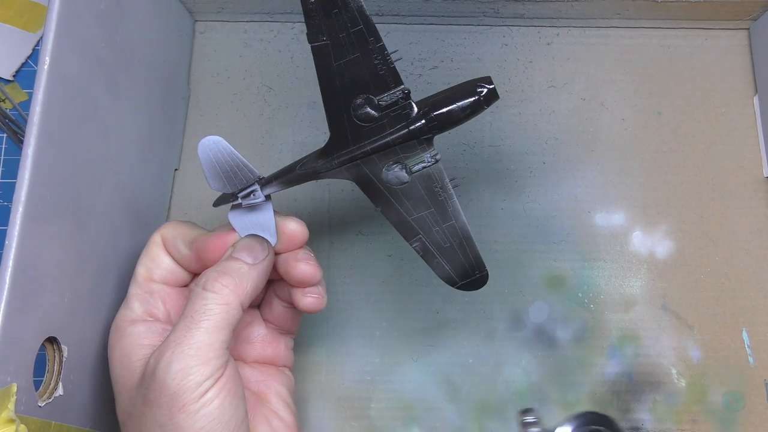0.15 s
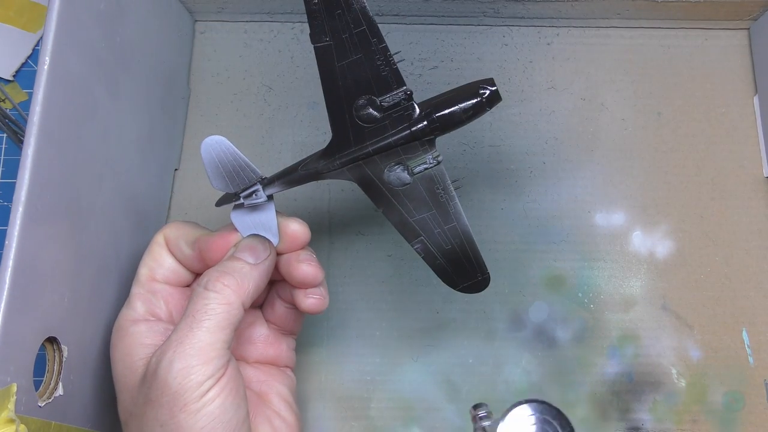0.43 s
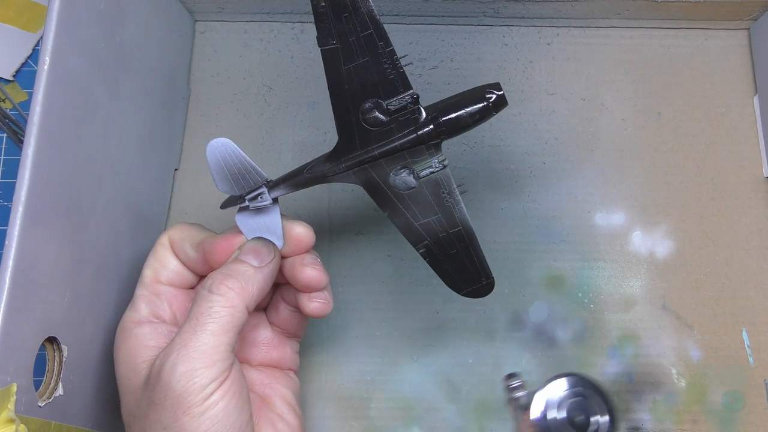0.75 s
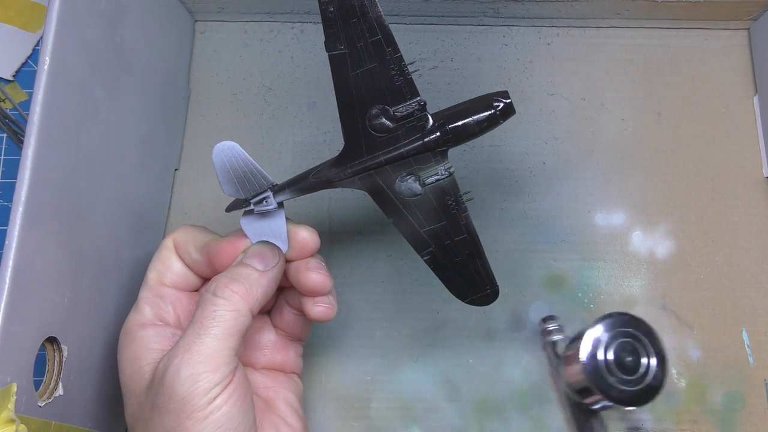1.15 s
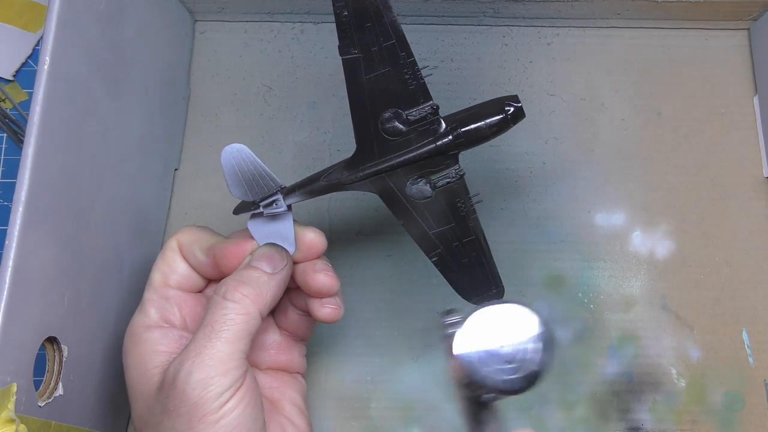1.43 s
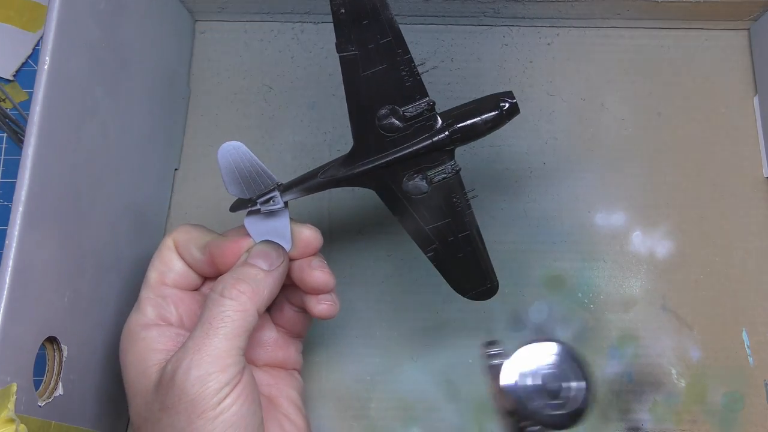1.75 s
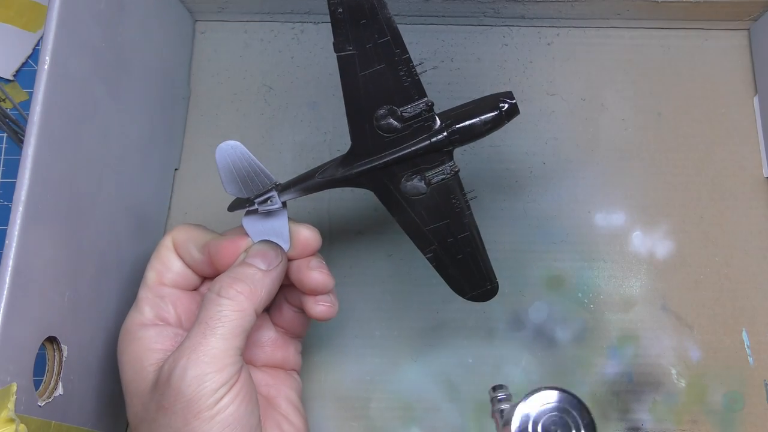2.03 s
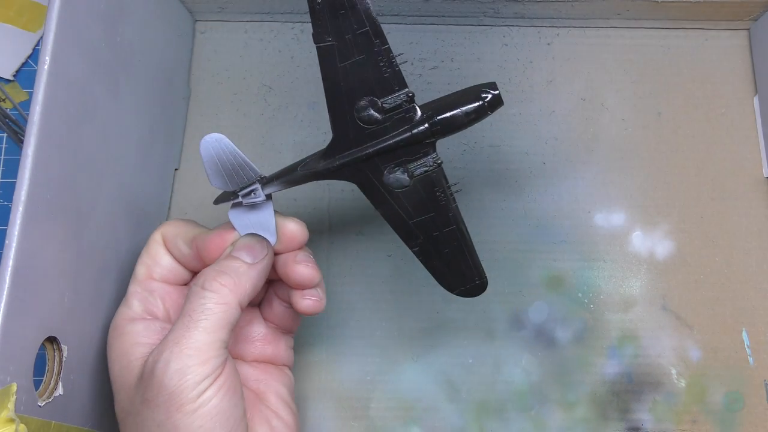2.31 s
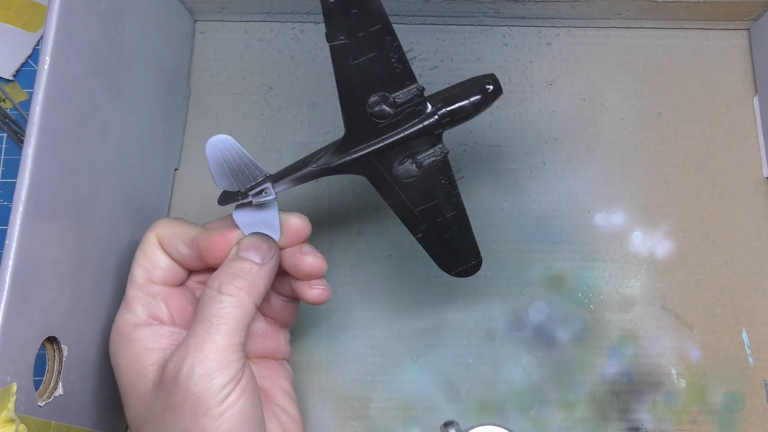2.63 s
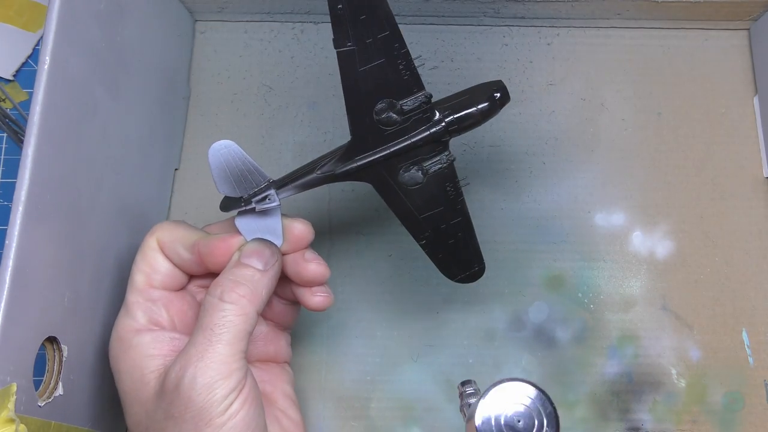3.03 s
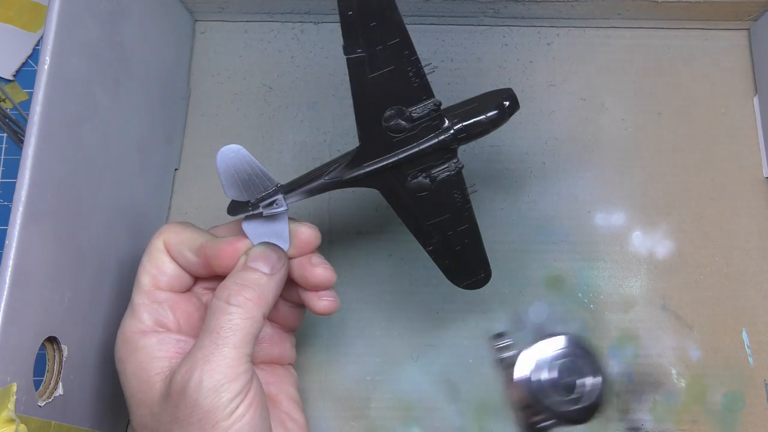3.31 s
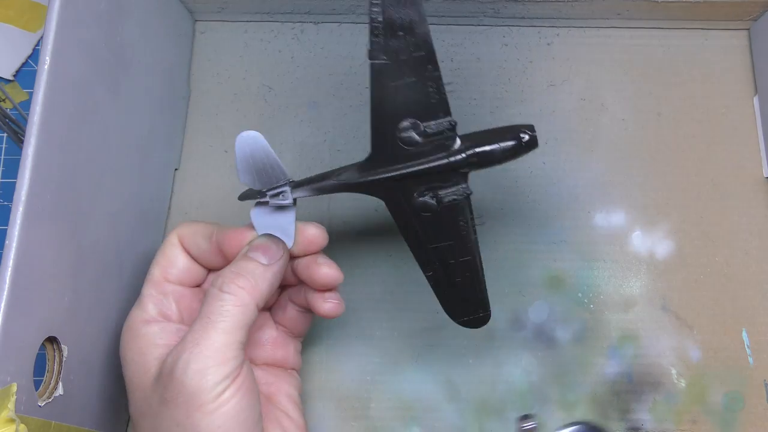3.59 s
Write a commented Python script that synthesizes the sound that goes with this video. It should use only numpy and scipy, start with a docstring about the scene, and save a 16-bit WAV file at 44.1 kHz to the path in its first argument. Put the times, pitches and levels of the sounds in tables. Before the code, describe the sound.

An airbrush hisses in one long spray and two short bursts over a low fan hum

```python
"""A cardboard booth in a small workroom: an airbrush sprays primer on a hand-held model, one long pass, two short.
The jet is shaped noise gated by a valve, with a gliding whistle, bands that ring up and drifting close echoes.
A duller rush of noise puffs where the jet crosses an edge of the model; a brief spit marks the last pull.
A fan of shaped noise and narrow tones hums behind. Handling is low gliding sines: a long rumble, a faint bump
and, at the end, a hollow knock with a noise scuff."""
import sys
import numpy as np
from scipy import signal
from scipy.io import wavfile
from scipy.ndimage import uniform_filter1d, map_coordinates

SR = 44100
rng = np.random.default_rng(int(sys.argv[2]) if len(sys.argv) > 2 else 0)


def to_wav(s):
    """Save 16-bit WAV."""
    ch = np.atleast_2d(s).T  # columns
    pcm = np.round(np.clip(ch, -1, 1) * 32767)  # PCM
    wavfile.write(sys.argv[1], SR, pcm.astype(np.int16))


N = 165375
T = np.arange(N) / SR
FFT_SIZE, HOP = 2048, 512
HZ = np.fft.rfftfreq(FFT_SIZE, 1 / SR)
FRAMES = N // HOP + 3


def amp(db):
    """Decibels to gain."""
    return 10 ** (np.asarray(db) / 20)


def unit(x):
    """Scales to rms 1."""
    return x / np.sqrt(np.mean(x ** 2) + 1e-20)


def over_hz(points):
    """Reads a table along log frequency."""
    hz, value = np.transpose(points)
    return np.interp(np.log(HZ + 1), np.log(hz + 1), value)


def over_time(points):
    """Reads a table along time."""
    return np.interp(T, *np.transpose(points))


def resonance(hz, width_hz):
    """A peak of height 1, width_hz wide at half height."""
    return 1 / (1 + (2 * (HZ - hz) / width_hz) ** 2)


def colour(points, peaks=()):
    """A broad spectrum with resonances on top, in dB."""
    return over_hz(points) + sum(lift_db * resonance(hz, width_hz) for hz, width_hz, lift_db in peaks)


def gaussian(centre_s, width_s):
    """A bell in time, peak 1; width_s is its standard deviation."""
    return np.exp(-.5 * ((T - centre_s) / width_s) ** 2)


def decay(t, t60_s):
    """An exponential fall of 60 dB in t60_s."""
    return np.exp(-np.log(1000) * t / t60_s)


def flicker(depth_db, size):
    """A random gain of rms depth_db that wanders over about size samples."""
    wander = signal.oaconvolve(rng.standard_normal(N), np.hanning(size), "same")
    return amp(depth_db * unit(wander))


# left-right likeness of airborne noise: pitch_hz, likeness (0-1)
AIR_SAME = [(100, 0.63), (450, 0.97), (1300, 0.91), (4400, 0.9), (7000, 1), (9000, 0.99), (11000, 0.72),
            (15000, 0.64)]
# left minus right: pitch_hz, balance_db
AIR_BALANCE = [(110, 3), (380, 1), (1290, -2.4), (4400, -.2), (8100, -.4), (15000, -2.2)]
# phase by which left leads: pitch_hz, lead_rad
AIR_PHASE = [(30, -.6), (110, -2), (380, -1.1), (1300, -.8), (2600, -.15), (15000, .1)]


def noise(shape_db, same, patchy_db=0):
    """Stereo noise of rms 1 with drifting patches, likeness, balance and phase set per frequency."""
    a, b, c, d, patches = np.moveaxis(rng.standard_normal((FRAMES, len(HZ), 5)), 2, 0)
    patches = uniform_filter1d(patches, size=16, axis=0)
    patches = unit(uniform_filter1d(patches, size=10, axis=1))
    like = np.clip(over_hz(same), -1, 1)
    left = a + 1j * b
    right = like * left + np.sqrt(1 - like ** 2) * (c + 1j * d)
    right = right * np.exp(-1j * over_hz(AIR_PHASE))
    lean = amp(over_hz(AIR_BALANCE) / 2)
    z = np.array([left * lean, right / lean]) * amp(shape_db + patchy_db * patches)
    _, x = signal.istft(z, nperseg=FFT_SIZE, noverlap=FFT_SIZE - HOP, time_axis=1, freq_axis=2)
    return unit(x[:, :N])


def narrow(hz, pole_width_hz):
    """A fuzzy complex tone, two-pole noise on a steady or moving pitch; its real part has rms 1."""
    keep = np.exp(-np.pi * pole_width_hz / SR)
    raw = rng.standard_normal(N) + 1j * rng.standard_normal(N)
    band = signal.lfilter([1], np.poly([keep, keep]), raw)
    turns = np.cumsum(hz * np.ones(N)) / SR
    return band / np.std(band.real) * np.exp(2j * np.pi * turns)


# fan noise: pitch_hz, density_db
FAN = [(25, -3), (90, -5.5), (185, 0), (280, -6.5), (800, -20.5), (1500, -19.5), (2500, -22.5), (3700, -34),
       (15500, -37.5)]
# duct resonance: pitch_hz, width_hz, lift_db
FAN_PEAKS = [(1820, 230, 3.5)]
# left-right likeness: pitch_hz, likeness (0-1)
FAN_SAME = [(60, 0.95), (150, 0.86), (1650, 0.28), (6000, 0.46)]
# hum and whines: pitch_hz, pole_width_hz, level_db
FAN_TONES = [(142.6, 20, -53.5), (957, 24, -65.5), (1768, 70, -62.5)]
FAN_DB, FAN_PATCHY_DB = -49.5, 1.5


def fan():
    """Steady extractor noise with a duct resonance, a wavering hum and two faint whines."""
    out = amp(FAN_DB) * noise(colour(FAN, FAN_PEAKS), FAN_SAME, FAN_PATCHY_DB)
    for hz, pole_width_hz, level_db in FAN_TONES:
        lead_rad = np.interp(hz, HZ, over_hz(AIR_PHASE))
        sides = np.exp(-1j * np.array([[0], [lead_rad]]))
        out += amp(level_db) * (narrow(hz, pole_width_hz) * sides).real
    return out


ROOM_DB, ROOM_T60_S, ROOM_GAP_S = -21.5, 0.23, .003


def room(x):
    """A short tail of the small workroom: decaying noise, independent left and right."""
    t = T[:SR // 2]
    tail = rng.standard_normal((2, len(t))) * decay(t, ROOM_T60_S) * (t > ROOM_GAP_S)
    return signal.oaconvolve(x, tail / np.linalg.norm(tail[0]), axes=1)[:, :N]


def echo(x, lag_ms):
    """A copy that arrives later by a fixed or moving lag."""
    at = (T - lag_ms / 1000) * SR
    return np.array([map_coordinates(side, [at], order=3) for side in x])


SCATTER_FIRST_MS, SCATTER_LAST_MS, SCATTER_SPREAD_MS = 1.5, 9, 1
SCATTER_DRIFT_MS, SCATTER_MAX_DRIFT_HZ, SCATTER_GAIN = 0.042, .5, 0.081


def booth(x, count=6):
    """Echoes off the model, the cup and the cardboard comb the sound and drift with the hand."""
    out = x
    lags_ms = np.linspace(SCATTER_FIRST_MS, SCATTER_LAST_MS, num=count)
    for lag_ms, (place, pace, phase) in zip(lags_ms, rng.random((count, 3))):
        drift_ms = SCATTER_DRIFT_MS * np.sin(2 * np.pi * (SCATTER_MAX_DRIFT_HZ * pace * T + phase))
        out = out + SCATTER_GAIN * echo(x, lag_ms + SCATTER_SPREAD_MS * place + drift_ms)
    return out


# scuff of the grip, level: time_s, level_db
SCUFF_LEVEL = [(3.54, -68), (3.56, -47.5), (3.58, -44), (3.596, -40), (3.607, -56), (3.65, -78)]
# scuff colour: pitch_hz, density_db
SCUFF = [(450, 14), (800, -1), (1800, 6), (4000, 0.5), (9000, -11)]
# scuff ring: pitch_hz, width_hz, lift_db
SCUFF_PEAKS = [(1210, 150, 11)]


def scuff():
    """The grip scuffs: shaped noise with one ring."""
    return noise(colour(SCUFF, SCUFF_PEAKS), AIR_SAME) * amp(over_time(SCUFF_LEVEL))


# handling bumps: start_s, rise_s, hold_s, t60_s, settled_pitch_hz, peak_db
BUMPS = [(.665, .1, .1, .3, 44, -38.5), (3.024, .018, .003, .04, 190, -42.5),
         (3.577, .013, .01, .075, 236, -31)]
BUMP_LEFT_LEAD_S, BUMP_SAG_HZ, BUMP_SETTLE_S = 0.0007, 26, 0.021


def bumps():
    """Soft bumps swell while their pitch sags onto one low note."""
    out = np.zeros((2, N))
    for start_s, rise_s, hold_s, t60_s, hz, peak_db in BUMPS:
        t = T - start_s - np.array([[0], [BUMP_LEFT_LEAD_S]])
        swell = np.clip(t / rise_s, 0, 1) * decay(np.maximum(t - rise_s - hold_s, 0), t60_s)
        sag_turns = BUMP_SAG_HZ * BUMP_SETTLE_S * np.exp(-np.maximum(t, 0) / BUMP_SETTLE_S)
        out += amp(peak_db) * swell * np.sin(2 * np.pi * (hz * t - sag_turns))
    return out


OPEN_S, SHUT_DB_PER_S = 0.015, 773


def valve(on_s, off_s):
    """Air flow: a quick opening, a hold, and a fall as the line empties."""
    return np.clip((T - on_s) / OPEN_S, 0, 1) * amp(-SHUT_DB_PER_S * np.maximum(T - off_s, 0))


# trigger pulls, shared by rush and jet: air_on_s, full_opening_start_s, released_s, top_lift_db
PULLS = [(-.2, -.1, 2.390, 0), (2.686, 2.770, 2.963, 1.6), (3.060, 3.103, 3.468, 1.4)]
# rush colour: pitch_hz, density_db
RUSH = [(170, -14), (250, 0), (480, -2), (750, -4), (1100, -9.5), (2000, -13), (12000, -30)]
# rush between puffs: time_s, level_db
RUSH_LEVEL = [(.6, -44.5), (1.15, -44), (1.2, -52), (1.28, -42.5), (1.6, -46), (1.8, -43.5), (2.315, -43),
              (2.338, -74), (2.72, -41.5), (2.95, -47.5), (3.45, -48)]
# puffs as the jet crosses an edge: time_s, level_db
PUFFS = [(.26, -42), (.37, -39), (.505, -40), (0.631, -41.5), (.77, -40.5), (.83, -41.5), (.99, -37),
         (1.07, -45.5), (1.141, -41), (1.255, -42), (1.337, -37.5), (1.425, -40.5), (1.70, -40.5),
         (1.77, -36.5), (1.841, -42), (1.909, -38), (2.025, -40.5), (2.075, -46), (2.175, -40), (2.25, -59),
         (2.87, -39.5), (3.094, -39.5), (3.231, -40), (3.41, -44.5)]
PUFF_S, RUSH_FLICKER_DB = 0.02, 2.1


def rush():
    """Air tumbles over the model and swells into a puff at each edge; powers add."""
    power = amp(over_time(RUSH_LEVEL)) ** 2
    for time_s, level_db in PUFFS:
        power += (amp(level_db) * gaussian(time_s, PUFF_S)) ** 2
    flow = sum(valve(on_s, off_s) for on_s, _, off_s, _ in PULLS)
    return noise(colour(RUSH), AIR_SAME) * np.sqrt(power) * flow * flicker(RUSH_FLICKER_DB, size=600)


# spit colour: pitch_hz, density_db
SPIT = [(2300, -0.5), (6000, 5), (8000, 1)]
SPIT_S, SPIT_DB, SPIT_WIDTH_S = 3.0675, -28.5, 0.0025


def spit():
    """Paint left on the needle is blown off with the first air of the last pull: a brief noise burst."""
    return noise(colour(SPIT), AIR_SAME) * amp(SPIT_DB) * gaussian(SPIT_S, SPIT_WIDTH_S)


# breathy nozzle whistle: time_s, pitch_hz, level_db
WHISTLE = [(0, 9940, -43), (.3, 9840, -38), (.75, 9780, -41), (.88, 10080, -39), (1.02, 10120, -37.5),
           (1.14, 10000, -52), (1.25, 9650, -44), (1.55, 9730, -42.5), (1.66, 10130, -37.5),
           (1.78, 10260, -38), (2.06, 10320, -44), (2.25, 9700, -39), (2.6, 9720, -54)]
WHISTLE_POLE_WIDTH_HZ = 570


def whistle():
    """A narrow band of the hiss that follows the nozzle's pitch."""
    time_s, pitch_hz, level_db = np.transpose(WHISTLE)
    tone = narrow(np.interp(T, time_s, pitch_hz), WHISTLE_POLE_WIDTH_HZ).real
    return tone * amp(np.interp(T, time_s, level_db))


# bands ringing while the brush holds one angle: start_s, end_s, pitch_hz, lift_db
RINGS = [(-.2, 1.5, 4000, 4), (-.2, 0.98, 6960, 4), (.88, 1.6, 5400, 5), (1.65, 2.13, 5940, 1),
         (1.7, 2.37, 6900, 5), (1.8, 2.3, 8600, 5.5), (2.83, 3, 3580, 6), (2.83, 3.3, 4300, 6),
         (2.7, 3, 10550, 5), (2.7, 3, 11400, 6.5), (3.05, 3.5, 9280, 4), (3.05, 3.5, 10300, 3),
         (3.33, 3.6, 5470, 6)]
RING_WIDTH_HZ, RING_FADE_S = 226, 0.04


def rings():
    """Lift in dB, frame by frame, of the bands that ring up and fade."""
    t = np.arange(FRAMES)[:, None] * HOP / SR
    lift = 0
    for start_s, end_s, hz, lift_db in RINGS:
        held = (np.tanh((t - start_s) / RING_FADE_S) - np.tanh((t - end_s) / RING_FADE_S)) / 2
        lift = lift + lift_db * held * resonance(hz, RING_WIDTH_HZ)
    return lift


# jet hiss: pitch_hz, density_db
JET = [(200, -22), (450, -16.5), (1000, -12.5), (1800, -11), (2800, -8), (7400, -4.5), (9400, -0.85),
       (11000, -1), (12200, 0.5), (14500, -2), (15700, -3)]
# nozzle and cup colours: pitch_hz, width_hz, lift_db
JET_PEAKS = [(1990, 59, 2.5), (2790, 140, 2.5), (7530, 380, -2)]
# full-flow level as the hand moves: time_s, level_db
JET_LEVEL = [(0, -28.5), (.6, -28), (1.55, -27.5), (1.78, -27), (1.85, -28.5), (1.93, -27), (2.39, -28.5),
             (2.8, -28), (3.3, -27), (3.47, -27.5)]
# where the brush angle lifts the hiss: pitch_hz, width_hz
TOP = (9500, 14000)
HALF_OPEN_DB, FULL_S = -6.5, .018
JET_PATCHY_DB, JET_FLICKER_DB = 1.49, 0.4


def jet():
    """The nozzle hisses softly at half trigger, then fully."""
    out, tone, lift = np.zeros((2, N)), whistle(), rings()
    for on_s, full_s, off_s, top_db in PULLS:
        shape = colour(JET, [*JET_PEAKS, (*TOP, top_db)]) + lift
        hiss = noise(shape, AIR_SAME, JET_PATCHY_DB) * amp(over_time(JET_LEVEL))
        trigger = amp(HALF_OPEN_DB * np.clip(1 - (T - full_s) / FULL_S, 0, 1))
        out += (hiss + tone) * valve(on_s, off_s) * trigger
    return out * flicker(JET_FLICKER_DB, size=400)


def scene():
    """The airbrush and the hands in the room, over the fan."""
    near = booth(jet() + rush() + spit()) + scuff() + bumps()
    return near + amp(ROOM_DB) * room(near) + fan()


EDGE_HZ = 15780


def record(dry):
    """A steep low-pass at EDGE_HZ."""
    lowpass = signal.firwin(1023, EDGE_HZ, window=("kaiser", 8), fs=SR)
    return signal.oaconvolve(dry, lowpass[None], "same")


dry = scene()
out = record(dry)
to_wav(out)
```